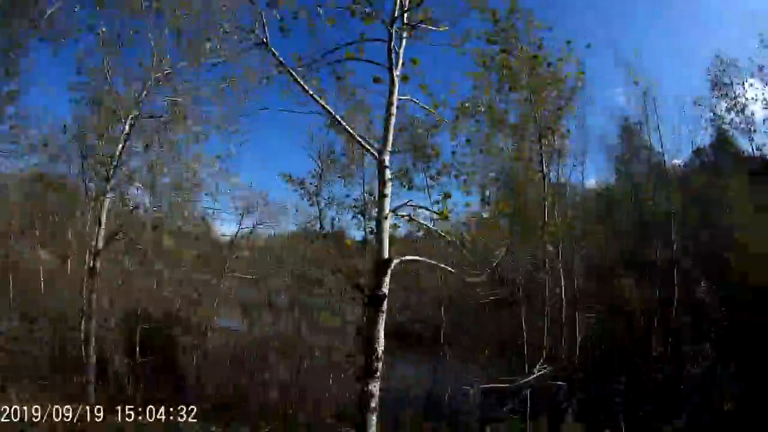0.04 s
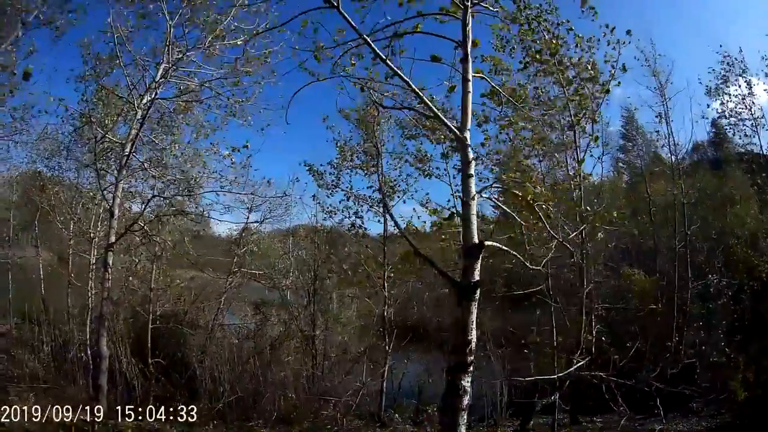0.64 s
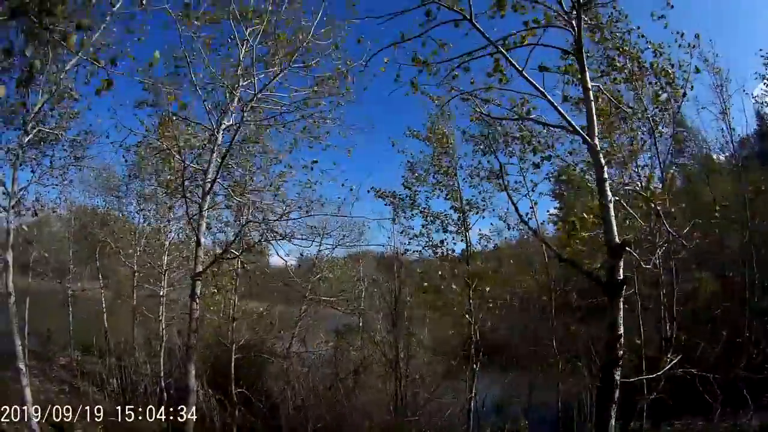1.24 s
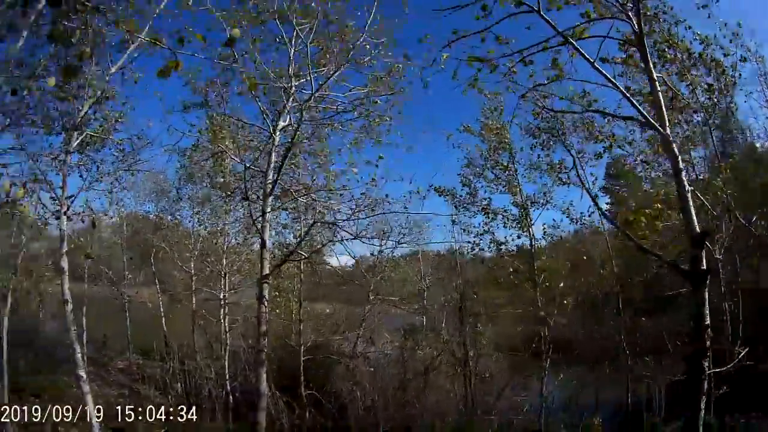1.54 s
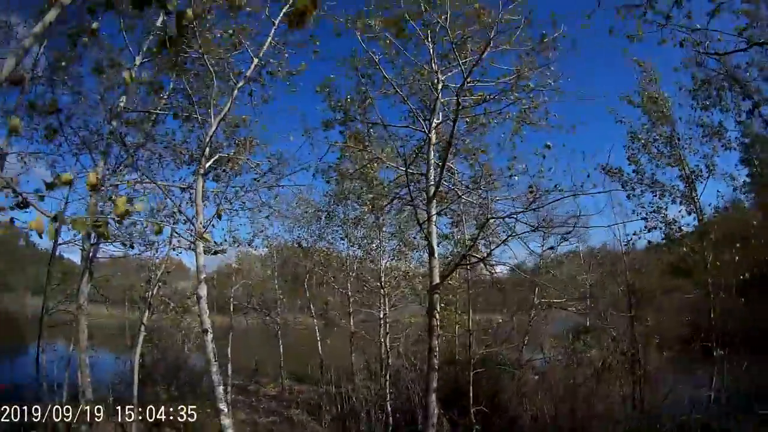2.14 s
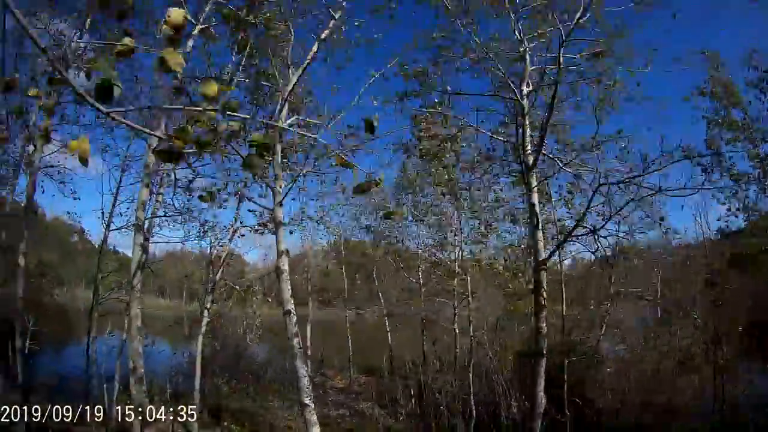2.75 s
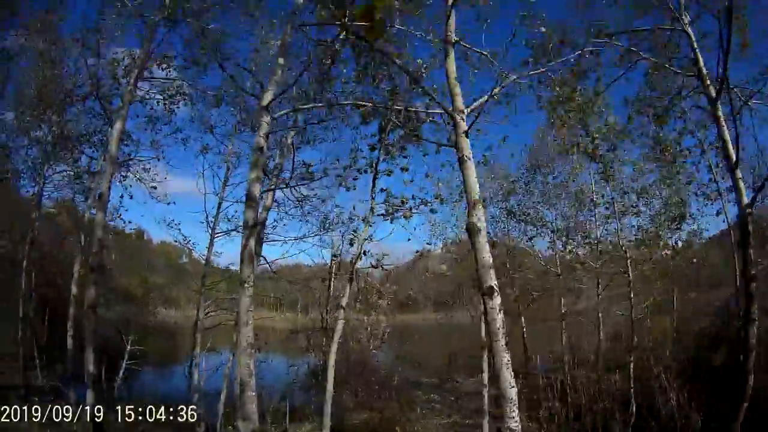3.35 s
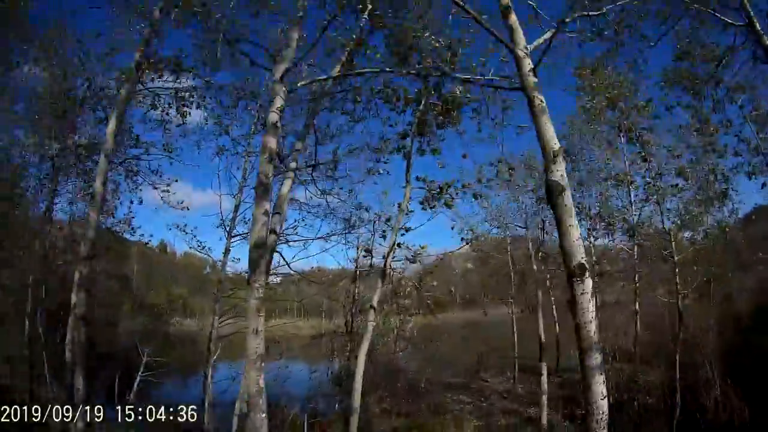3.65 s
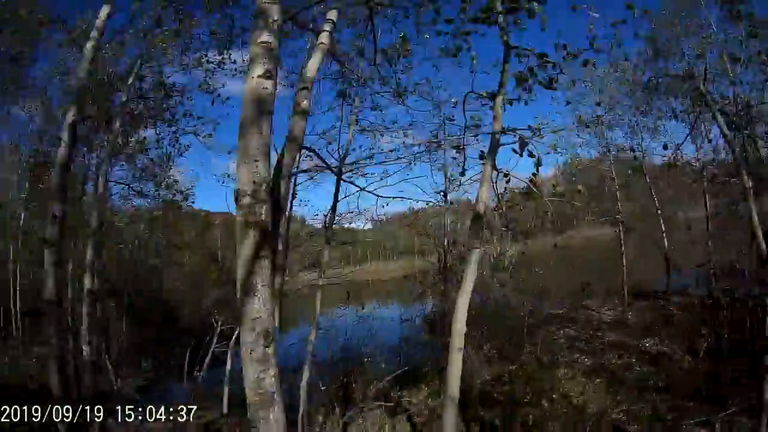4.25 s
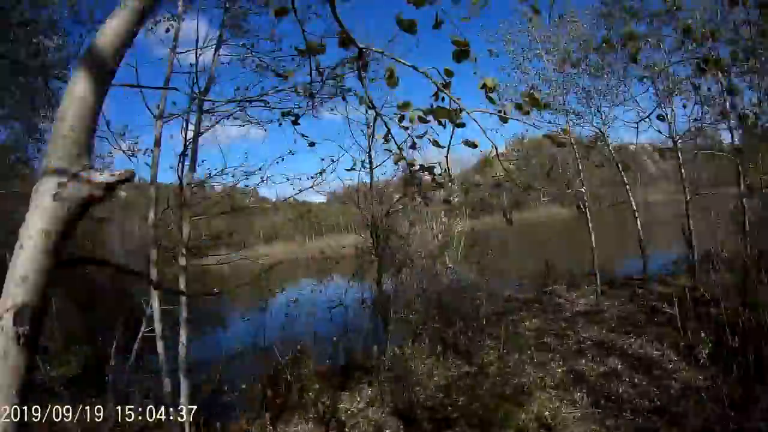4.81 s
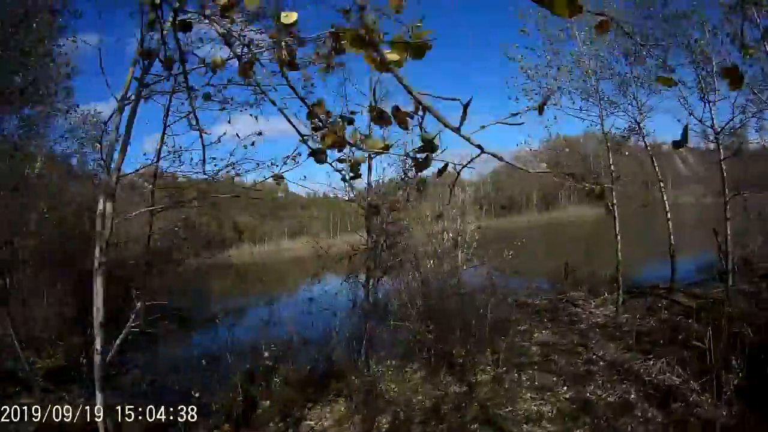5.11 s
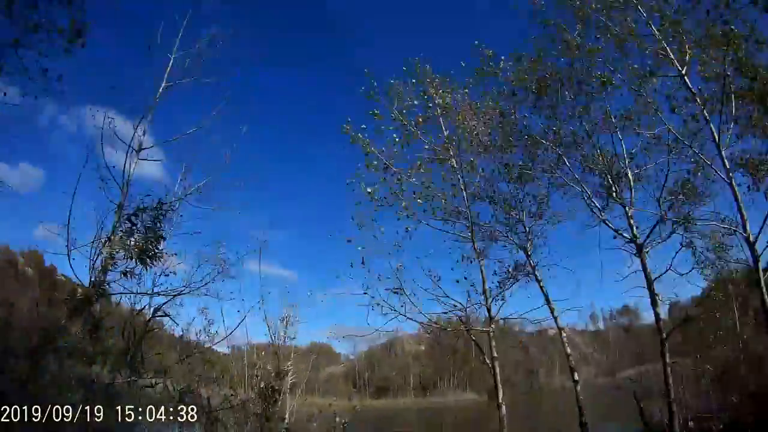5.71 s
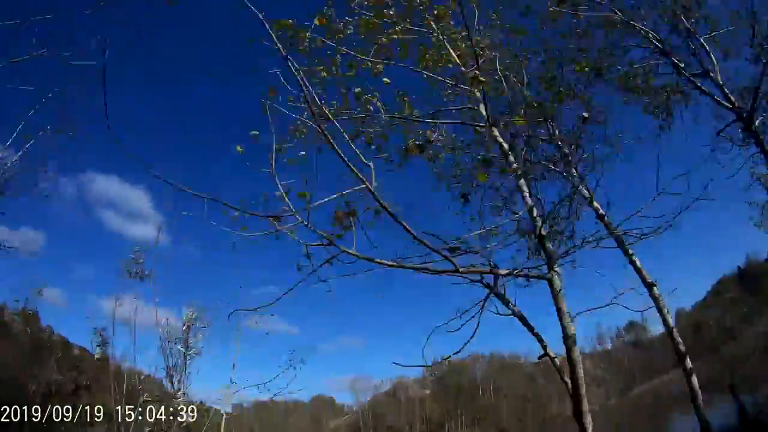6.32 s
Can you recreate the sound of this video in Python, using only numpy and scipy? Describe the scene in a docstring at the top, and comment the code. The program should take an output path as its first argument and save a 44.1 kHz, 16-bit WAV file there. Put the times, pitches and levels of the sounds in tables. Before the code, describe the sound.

Faint wind and handling noise by a woodland pond, then a loud gunshot echoes, twigs snap softly, and a second shot cracks.

```python
"""Two gunshots by a woodland pond, each with a swelling echo, over faint wind and handling noise.
Bullet crack, muzzle blast and ground reflection ring and overload a small microphone carried along
the bank. Nearby leaves and trunks scatter each shot; the wooded banks and far shore answer later.
Underneath: a breeze, gusts and hand bumps on the microphone, twigs underfoot and preamplifier hiss."""
import sys
import numpy as np
from scipy import signal
from scipy.fft import rfft, irfft, next_fast_len
from scipy.io import wavfile

SR = 44100
rng = np.random.default_rng(int(sys.argv[2]) if len(sys.argv) > 2 else 0)


def master(y):
    """Save y as 16-bit WAV."""
    cut = np.clip(np.atleast_2d(y).T, -1, 1)
    pcm = np.round(cut * 32767)  # scale
    wavfile.write(sys.argv[1], SR, pcm.astype(np.int16))


N = 285327
TIME_S = np.arange(N) / SR
FFT_SIZE = 2 * next_fast_len(N // 2 + SR // 4)
FREQ_HZ = np.fft.rfftfreq(FFT_SIZE, 1 / SR)


def undb(db):
    """Decibels to gain."""
    return 10 ** (np.asarray(db) / 20)


def spectrum(rows):
    """Gain per frequency from (f/Hz, level/dB) rows."""
    hz, db = np.transpose(rows)
    return undb(np.interp(np.log(FREQ_HZ + 1), np.log(hz), db))


def resonance(hz, width_hz):
    """Band-pass response, unity at the centre."""
    return 1j * FREQ_HZ * width_hz / (hz ** 2 - FREQ_HZ ** 2 + 1j * FREQ_HZ * width_hz)


def grains(response, spread_db=0):
    """Dense filtered clicks of uneven size, rms 1; zero spread gives smooth noise."""
    clicks = rng.standard_normal(FFT_SIZE)
    sizes = undb(spread_db * np.clip(rng.standard_normal(FFT_SIZE), -3, 3))
    sound = irfft(rfft(clicks * sizes) * response)[:N]
    return sound / sound.std()


def flutter(rate_hz, depth_db):
    """Randomly wandering gain."""
    steps = rng.standard_normal(2048)
    return undb(depth_db * np.interp(TIME_S * rate_hz, np.arange(len(steps)), steps))


def since(at_s):
    """Seconds since at_s, zero before."""
    return np.maximum(TIME_S - at_s, 0)


def burst(at_s, fade_s, rise_s=0.00074):
    """Envelope: fast rise, exponential decay."""
    age_s = since(at_s)
    return (1 - np.exp(-(age_s / rise_s) ** 2)) * np.exp(-age_s / fade_s)


def hump(peak_s, rise_s, fall_s):
    """Envelope: swell to 1 with long skirts."""
    distance = (TIME_S - peak_s) / np.where(TIME_S < peak_s, rise_s, fall_s)
    return np.exp(1 - np.hypot(1, 1.5 * distance))


# Preamplifier noise spectrum: f/Hz, level/dB
HISS_SPECTRUM = [(100, 15), (3000, 0), (7000, -1), (14000, -2), (15600, -5), (16200, -41)]

def hiss(level_db=-69.5):
    """Steady preamplifier noise."""
    return undb(level_db) * grains(spectrum(HISS_SPECTRUM))


# Breeze strength: t/s, level/dB
BREEZE_LEVELS = [(0, -59), (1.8, -65.5), (2.45, -59.5), (2.85, -63), (4.2, -57.5), (6.47, -59.5)]
# Breeze spectrum: f/Hz, level/dB
BREEZE_SPECTRUM = [(100, 3.5), (300, 2), (600, -0.5), (1000, -2.5), (1500, -7.5), (2100, -18),
                   (3200, -25.5), (6000, -51)]

def breeze():
    """Soft, wavering wind in the trees."""
    times_s, levels_db = np.transpose(BREEZE_LEVELS)
    strength = undb(np.interp(TIME_S, times_s, levels_db))
    air = grains(spectrum(BREEZE_SPECTRUM), spread_db=3)
    return air * strength * flutter(rate_hz=12, depth_db=2.1)


# Gusts: peak t/s, level/dB, rise/s
GUSTS = [(.25, -51.5, .04), (.7, -56, 0.37), (1.55, -64, 0.14), (2.39, -46.5, 0.084), (3.15, -46, 0.078),
         (3.6, -42, 0.052), (3.83, -51.5, 0.12), (4.13, -47, 0.087), (4.72, -49.5, 0.31), (5.3, -51, 0.23),
         (6.35, -57, 0.17)]
# Rumble spectrum: f/Hz, level/dB
RUMBLE_SPECTRUM = [(15, -13.5), (32, 1.5), (80, -4.5), (130, -7.5), (200, -12.5), (330, -20), (550, -29.5),
                   (1200, -37.5), (2500, -61.5)]

def gust_rumble(calm_db=-62.5, fall_ratio=1.73):
    """Air on the microphone: gusts rise and fall over a low, uneven rumble."""
    power = sum((undb(db) * hump(at_s, rise_s, fall_ratio * rise_s)) ** 2 for at_s, db, rise_s in GUSTS)
    strength = np.sqrt(undb(calm_db) ** 2 + power)
    rumble = grains(spectrum(RUMBLE_SPECTRUM), spread_db=5)
    return rumble * strength * flutter(rate_hz=24, depth_db=3)


# Hand bumps: t/s, level/dB, swell/s, f/Hz
HAND_BUMPS = [(.02, -42, 0.017, 64.7), (0.208, -48.5, .028, 66), (1.57, -49, .01, 54),
              (2.218, -46.5, .014, 58), (2.36, -37.5, .011, 59), (2.362, -41, .008, 219),
              (2.697, -46.5, 0.016, 47), (3.087, -40.5, .019, 71), (3.316, -34.5, 0.011, 67),
              (3.324, -48, .0097, 235), (3.439, -38, .0092, 45), (3.553, -39.5, 0.012, 61.6),
              (3.928, -41.5, 0.0032, 70), (4.833, -35, .0085, 148), (4.857, -32, 0.0073, 91),
              (5.993, -41.5, 0.0097, 185)]

def hand_bumps():
    """The hand knocks the housing: a few dull cycles and a scuff."""
    scuff = undb(-13.5) * grains(resonance(hz=200, width_hz=230) ** 2, spread_db=7.5)
    out = 0
    for at_s, db, swell_s, hz in HAND_BUMPS:
        age_s = since(at_s)
        swells = age_s / swell_s
        push = swells * np.exp(1 - swells - (swells / 4) ** 2)
        out += undb(db) * push * (np.sin(2 * np.pi * hz * age_s) + scuff)
    return out


# Twigs and dry leaves underfoot: t/s, level/dB, fade/s, splinter/dB re wood
TWIG_SNAPS = [(4.956, -55, 0.011, -9), (5.031, -50, 0.0096, -26), (5.4, -48.5, 0.032, -27),
              (5.568, -44.5, 0.0047, -23), (5.721, -48.5, 0.0084, -17.5), (5.877, -49.5, 0.007, -22),
              (5.96, -47, .006, -16.5), (6.126, -49.5, 0.0093, -18)]

def twigs(wood_hz=790, splinter_hz=2750):
    """Each twig gives way in a burst of tiny fractures, woody with a bright edge."""
    wood = grains(resonance(wood_hz, 1.3 * wood_hz) ** 4, spread_db=5)
    splinter = grains(resonance(splinter_hz, 1.3 * splinter_hz) ** 4, spread_db=5)
    return sum(undb(db) * burst(at_s, fade_s) * (wood + undb(splinter_db) * splinter)
               for at_s, db, fade_s, splinter_db in TWIG_SNAPS)


# Leaf scatter spectrum: f/Hz, level/dB
LEAF_SPECTRUM = [(1500, -29), (3500, 3), (5000, -1.5), (8000, 0), (9200, -16), (10500, -16.5), (12000, -34),
                 (15000, -47.5)]

def leaf_scatter(at_s, level_db=-54):
    """Bright returns from leaves, soon absorbed by the air."""
    return undb(level_db) * grains(spectrum(LEAF_SPECTRUM), spread_db=5.5) * burst(at_s, fade_s=0.068)


# Trunk scatter spectrum: f/Hz, level/dB
TRUNK_SPECTRUM = [(60, -18.5), (200, -2.5), (450, -9), (800, 1.5), (1150, 1), (1750, -3), (2500, -13.5),
                  (3400, -26.5), (5000, -28.5), (9000, -43.5), (13000, -70.5)]

def trunk_scatter(at_s, level_db=-21.5, spreading_s=0.0095, absorption_s=0.9):
    """Returns from nearby trunks weaken as the path grows and the wood absorbs them."""
    age_s = since(at_s)
    decay = np.exp(-age_s / absorption_s) / (1 + age_s / spreading_s)
    return undb(level_db) * grains(spectrum(TRUNK_SPECTRUM), spread_db=4.5) * decay


# Distinct returns from steep banks and tree stands: delay/s, level/dB
BANK_SLAPS = [(.39, -34.5), (.565, -34), (.618, -35)]
# Wooded shore echo spectrum: f/Hz, level/dB
SHORE_SPECTRUM = [(60, -15.5), (150, -14.5), (330, -8.5), (600, -4.5), (880, 2), (1200, -2.5), (1650, -15),
                  (2400, -21.5), (3500, -35.5), (6000, -56), (12000, -78.5)]

def shore_echo(at_s, round_trip_s=0.547, spread_s=0.075):
    """Dull echo: the banks sustain it, the far shore swells it, a rest keeps crossing the water."""
    attack_s, hold_s, release_s, linger_s = 0.14, 0.743, 0.065, 0.67
    age_s = since(at_s)
    banks = undb(-46) * np.exp(-since(at_s + hold_s) / release_s)
    far_shore = undb(-37.5) * hump(at_s + round_trip_s, spread_s, spread_s)
    linger = undb(-49) * np.exp(-age_s / linger_s)
    swell = np.minimum(age_s / attack_s, 1) * np.sqrt(banks ** 2 + far_shore ** 2 + linger ** 2)
    slaps = sum(undb(db) * burst(at_s + delay_s, fade_s=0.013, rise_s=0.002)
                for delay_s, db in BANK_SLAPS)
    returns = grains(spectrum(SHORE_SPECTRUM), spread_db=8)
    return returns * np.hypot(swell * flutter(rate_hz=50, depth_db=0.5), slaps)


# Microphone port resonances: f/Hz, width/Hz, level/dB
PORT_MODES = [(893, 354, 0), (1573, 271, 0)]

def microphone_ring(pressure_spectrum, lowpass_hz=3100):
    """A shock rings the port and flexes the housing, which adds a thump."""
    port = sum(undb(db) * resonance(hz, width_hz) for hz, width_hz, db in PORT_MODES)
    housing = undb(-30.5) * resonance(hz=254, width_hz=270)
    rolloff = (1 + 1j * FREQ_HZ / lowpass_hz) ** -2
    return irfft(pressure_spectrum * (port + housing) * rolloff)[:N]


def shock(at_s, push_ms):
    """Blast wave spectrum: the pressure jumps, then falls back linearly."""
    s = 2j * np.pi * np.maximum(FREQ_HZ, 1)  # Laplace variable
    push_s = push_ms / 1000
    ramp = (1 - np.exp(-s * push_s)) / (push_s * s ** 2)
    return SR * (1 / s - ramp) * np.exp(-s * at_s)


# Shots: t/s, blast/dB, push/ms, ground lag/ms, ground/dB re blast, crack lead/ms, crack/dB, echo/dB
SHOTS = [(4.18579, 20.2, 1.81, 1.62, -9.8, .98, -7, 0), (6.26535, 11, 1.61, 1.05, -4.8, 1.27, -3.6, -1)]

def gunshots(echo_onset_s=0.00052):
    """Bullet crack, muzzle blast and ground reflection, then the echoes of the woods."""
    out = 0
    for at_s, blast_db, push_ms, lag_ms, ground_db, lead_ms, crack_db, echo_db in SHOTS:
        crack = undb(crack_db) * shock(at_s - lead_ms / 1000, push_ms=0.201)
        blast = undb(blast_db) * shock(at_s, push_ms)
        ground = undb(blast_db + ground_db) * shock(at_s + lag_ms / 1000, push_ms)
        echoes = leaf_scatter(at_s) + trunk_scatter(at_s) + shore_echo(at_s)
        onset = np.minimum(since(at_s) / echo_onset_s, 1)
        out += microphone_ring(crack + blast + ground) + undb(echo_db) * onset * echoes
    return out


def scene():
    """Mono sum at the microphone."""
    return (gunshots() + gust_rumble() + hand_bumps() + twigs() + breeze())[None]


def record(dry):
    """The preamplifier hisses and clips the blasts flat; a steep low-pass follows."""
    clip_level, knee_hardness, cutoff_hz = 0.705, 25, 16000
    voltage = dry + hiss()
    clipped = voltage / (1 + np.abs(voltage / clip_level) ** knee_hardness) ** (1 / knee_hardness)
    lowpass = signal.ellip(8, 0.05, 60, cutoff_hz, fs=SR, output="sos")
    return signal.sosfiltfilt(lowpass, clipped)


dry = scene()
out = record(dry)
master(out)
```